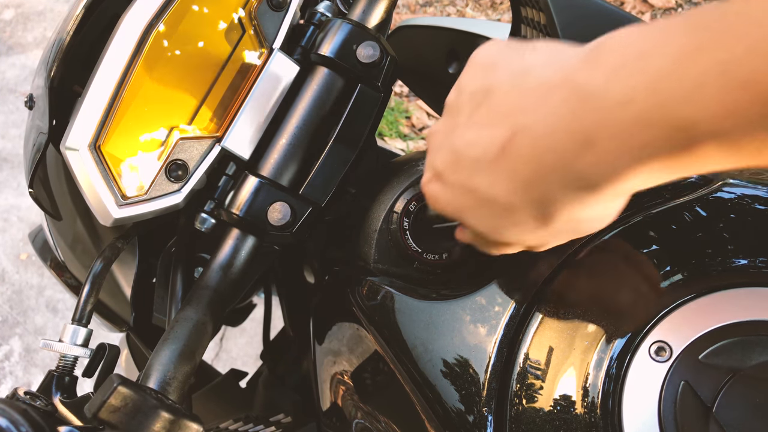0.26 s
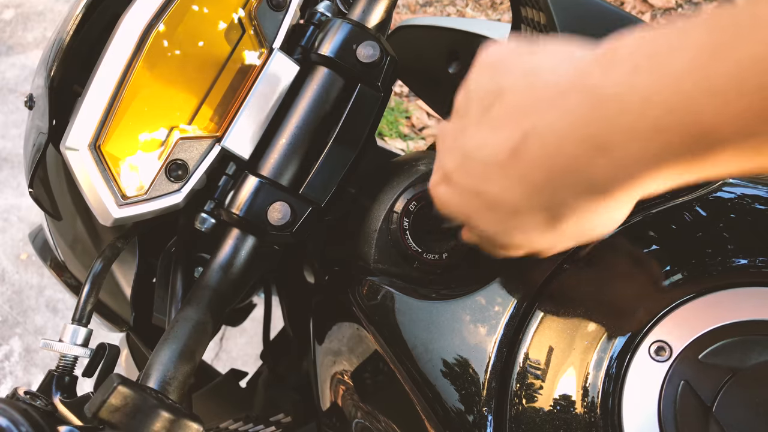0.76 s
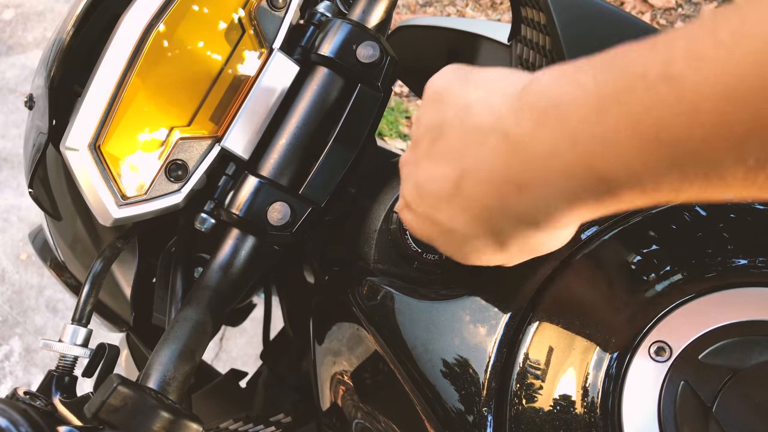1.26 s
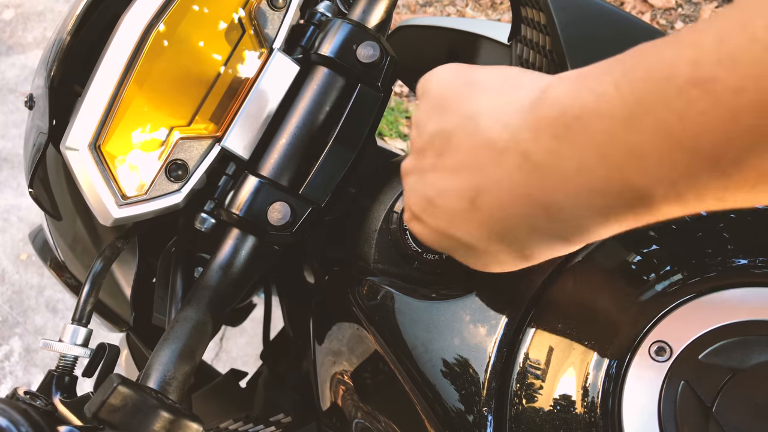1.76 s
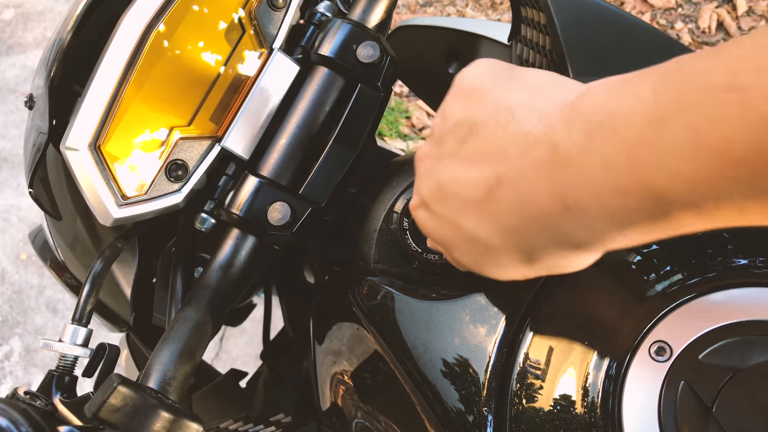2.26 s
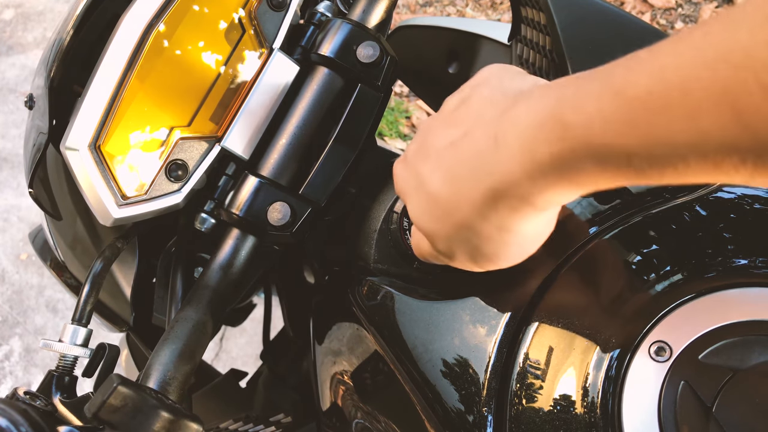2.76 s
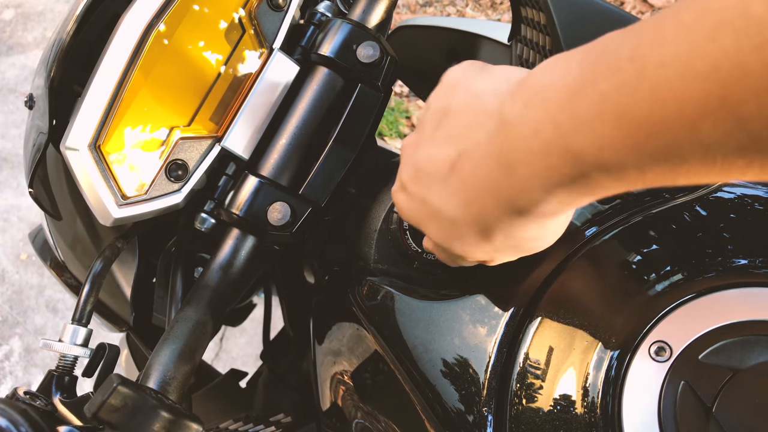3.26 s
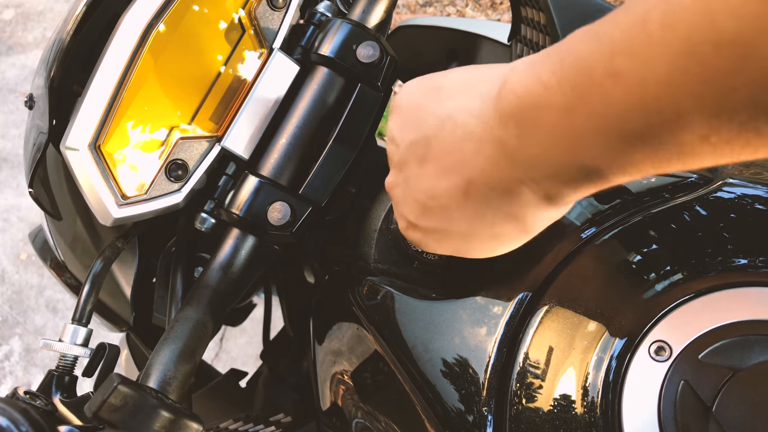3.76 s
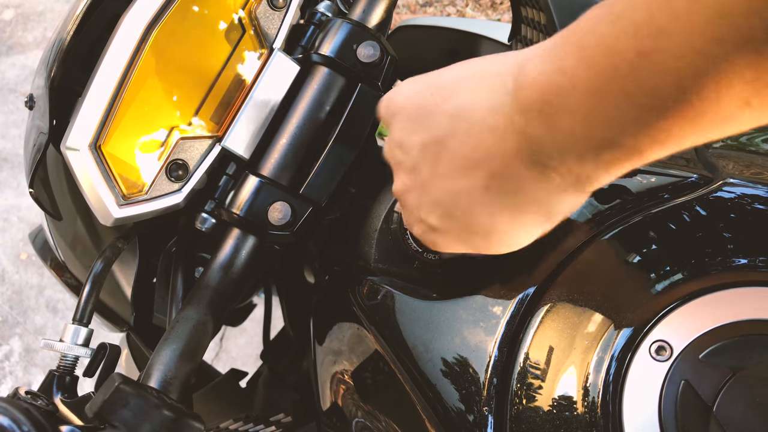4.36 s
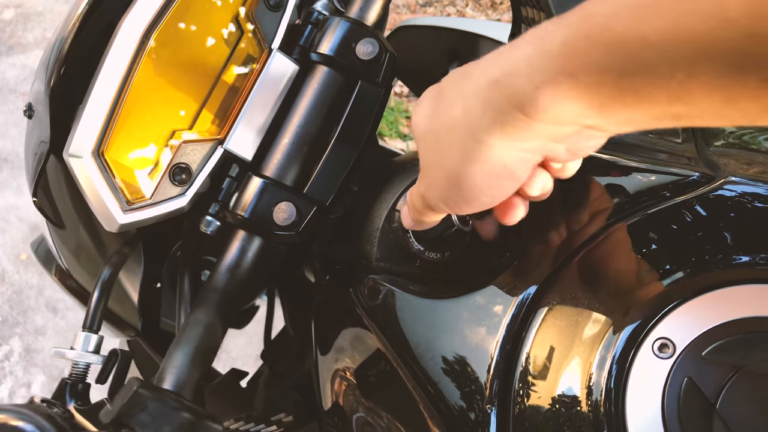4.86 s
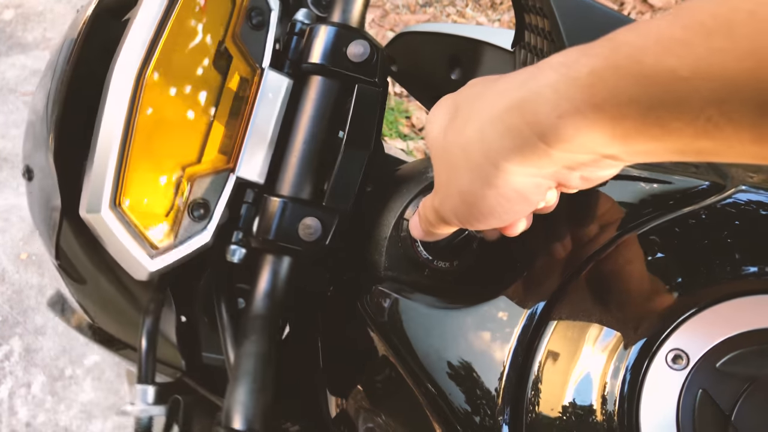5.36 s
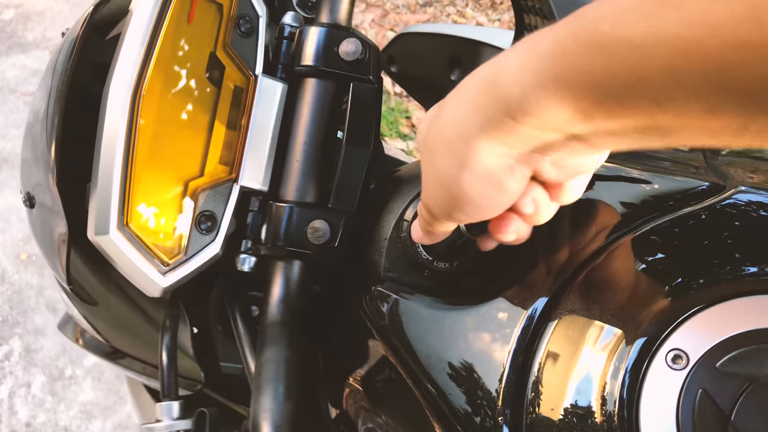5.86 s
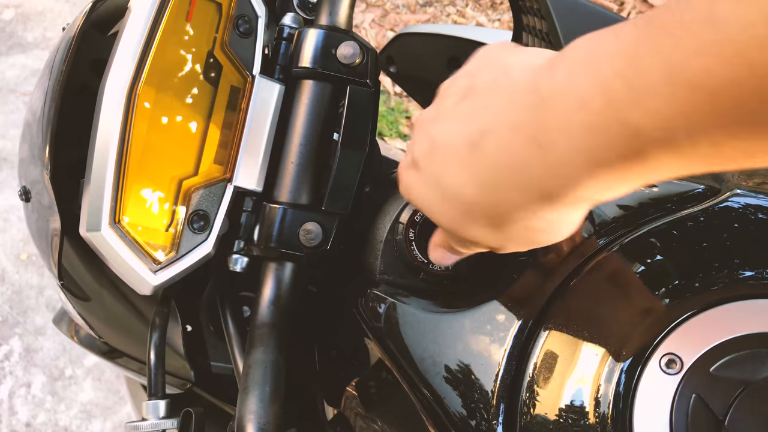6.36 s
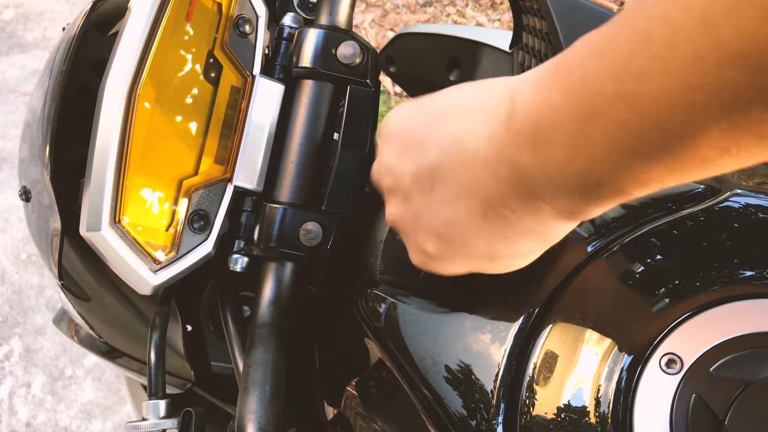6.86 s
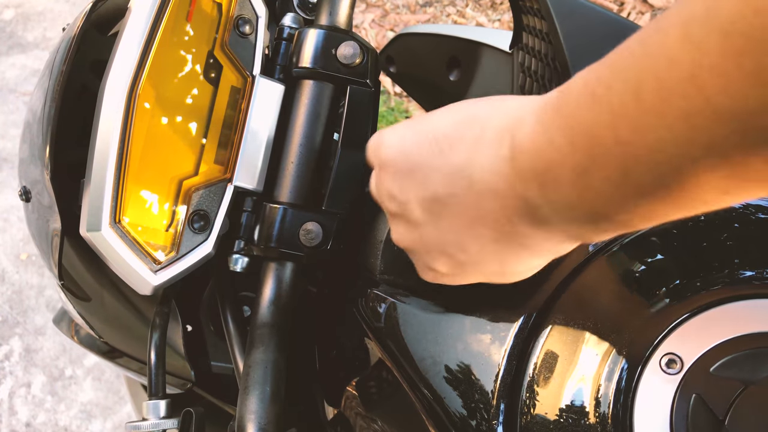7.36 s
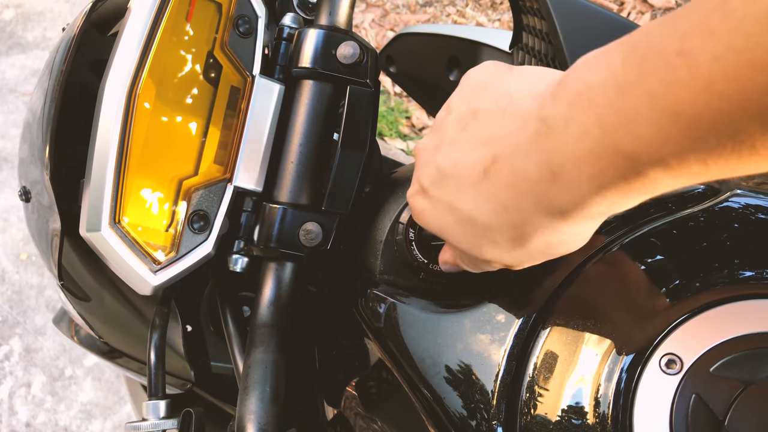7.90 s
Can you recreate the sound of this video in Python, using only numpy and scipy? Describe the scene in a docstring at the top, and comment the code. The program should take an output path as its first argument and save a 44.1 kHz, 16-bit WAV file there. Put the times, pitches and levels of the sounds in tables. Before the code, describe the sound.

Small, sharp clicks and gritty scrapes come from a key being worked in a motorcycle's stiff ignition, heard up close over a faint hum of traffic. After a quieter stretch the key ring chinks once and the handlebars knock and rattle as they turn. The rushing tyres of a passing car rise and slowly ease off in the open air, with several last clicks from the lock.

```python
"""Outdoors, close beside a parked motorcycle, a key is wiggled in the sticky ignition lock.
Stick-slip friction makes it scrape, impacts on the wafers make it click, and the frame rings faintly.
The key ring jingles, and the steering judders as it is swung, knocking the fork into resonance.
Traffic hums in the distance, a car swells past on tyre roar and a low engine drone,
and a thin, faint whistle glides twice."""
import sys
import numpy as np
from scipy import signal
from scipy.fft import rfft, irfft
from scipy.io import wavfile

SR = 44100
rng = np.random.default_rng(int(sys.argv[2]) if len(sys.argv) > 2 else 0)


def file_out(sig):
    """Save sig as 16-bit WAV at sys.argv[1]."""
    # one column per channel
    cols = np.atleast_2d(sig).T
    # limit, then scale
    lim = np.clip(cols, -1, 1)
    pcm = np.round(lim * 32767).astype(np.int16)
    wavfile.write(sys.argv[1], SR, pcm)


N = 358533
TIME = np.arange(N) / SR
WAFER_HZ = 3830   # typical pitch of a wafer click

# modes of the frame and tank: (frequency [Hz], level [dB], t60 [s])
FRAME_MODES = [(258.8, -52.5, 0.19), (387, -63.5, 0.46), (416, -59, 0.229), (539, -66, .2),
               (624, -61.5, 0.23), (988, -58.5, 0.29), (1480, -76, 0.19), (2280, -73.5, 0.32),
               (2880, -63, 0.17), (2800, -66, 0.21), (3165, -67, 0.23), (3590, -57, 0.13),
               (4600, -65.5, 0.11), (5600, -70, .15)]


def from_db(db):
    """Amplitude grows tenfold with every 20 dB."""
    return 10 ** (np.asarray(db) / 20)


def rms_one(x):
    """Normalisation to unit mean power."""
    return x / np.sqrt(np.mean(x ** 2) + 1e-20)


def decay(t, t60):
    """Exponential damping: 60 dB down after t60 seconds."""
    return np.exp(-np.log(1000) * t / t60)


def in_time(rows):
    """Linear interpolation of (time, values...) rows to one curve per value."""
    times, *columns = np.transpose(rows)
    return [np.interp(TIME, times, column) for column in columns]


def add(out, s, sound):
    """Superposition: a sound joins the mix at s seconds."""
    i = max(0, round(s * SR))
    out[i:i + len(sound)] += sound[:max(0, N - i)]


def noise(spectrum):
    """Spectral shaping of white noise by (frequency, level) rows, at unit power."""
    hz, db = np.transpose(spectrum)
    f = np.maximum(np.arange(N // 2 + 1) * SR / N, 1)
    skirt = np.minimum(1, hz[-1] / f) ** 2 * np.minimum(1, f / hz[0]) ** 2
    colour = from_db(np.interp(np.log(f), np.log(hz), db))
    return rms_one(irfft(rfft(rng.standard_normal(N)) * skirt * colour, N))


def drift(per_s):
    """Random modulation of unit power, heading for a new value per_s times a second."""
    knots = rng.standard_normal(2000)
    return rms_one(np.interp(TIME * per_s, np.arange(len(knots)), knots))


def band(x, low_hz, high_hz):
    """Band-pass filtering between two edges."""
    edges = [low_hz, min(high_hz, .45 * SR)]
    return signal.sosfilt(signal.butter(3, edges, "band", fs=SR, output="sos"), x)


def resonate(x, hz, width_hz, db):
    """A resonance lifts the band around its natural frequency."""
    return x + (from_db(db) - 1) * signal.lfilter(*signal.iirpeak(hz, hz / width_hz, fs=SR), x)


def ring(force, hz, t60):
    """A damped oscillator: a unit impulse starts a sine of height 1."""
    r, w = decay(1 / SR, t60), 2 * np.pi * hz / SR
    return signal.lfilter([0, np.sin(w)], [1, -2 * r * np.cos(w), r * r], force + 1e-18)


def strike(hits, modes, spread_db):
    """Modal response: each hit drives each mode by a random amount; neighbours swing opposite ways."""
    out = np.zeros(N)
    for k, (hz, mode_db, t60) in enumerate(modes):
        impulses = np.zeros(N)
        for (s, db), chance in zip(hits, rng.standard_normal(len(hits))):
            add(impulses, s, from_db([db + mode_db + spread_db * chance]))
        out += (-1) ** k * ring(impulses, hz, t60)
    return out


def swell(apex_s, apex_db, rise_db_per_s, fall_db_per_s, turn_s):
    """Level follows distance: ramps in dB for approach and retreat, rounded off below their apex."""
    t = TIME - apex_s
    away = np.hypot(t, turn_s)
    return apex_db - rise_db_per_s * (away - t) / 2 - fall_db_per_s * (away + t) / 2


def traffic(flutter_db=0.85):
    """Rolling tyres radiate broadband noise, which swells as far traffic and one car go by."""
    # spectra of far traffic and the car's roar, low body and tyre hiss: (frequency [Hz], level [dB])
    far = [(40, 8), (130, 6), (200, -3), (280, -2), (400, -6.5), (600, -5.5), (780, -2), (950, 2),
           (1200, -3.5), (1550, 1.5), (1900, -4), (2500, -13.5), (4000, -27), (9000, -37)]
    roar = [(200, -25.5), (400, -9), (620, -3), (820, 0.5), (1000, 2), (1130, -7.5), (1350, -2.5),
            (1700, -5.5), (2100, -11), (2700, -21), (4000, -47)]
    body = [(50, 2.5), (110, -7), (170, -2), (260, 1.5), (350, -6), (500, -3), (800, -26), (1500, -18.5)]
    hiss = [(1200, -8), (2200, 3.5), (3000, 0.5), (4200, -3), (5200, -9), (7000, -12.5), (9500, -20),
            (11000, -26), (16000, -30)]
    layers = [(far, swell(5.5, -45.5, 3, 1, .5)),
              (roar, swell(6, -34.5, 17.5, 3.5, .67)),
              (body, swell(6, -43, 17, .3, .5)),
              (hiss, swell(7, -48, 11, 10, .3))]
    tyres = sum(from_db(db + flutter_db * drift(14)) * noise(colour) for colour, db in layers)
    return resonate(tyres, hz=930, width_hz=110, db=1)   # air ringing in the grooves of the tread


def engine(firing_hz, db, harmonics, waver_db, wander):
    """Periodic exhaust pulses give wavering harmonics (order, level [dB]) of the firing rate."""
    phase = 2 * np.pi * np.cumsum(firing_hz * (1 + wander * drift(12))) / SR
    return np.sqrt(2) * sum(from_db(db + order_db + waver_db * drift(9.2)) * np.sin(order * phase)
                            for order, order_db in harmonics)


def street():
    """Independent sources add in power: tyres, a far idling engine, the car's engine and open air."""
    # the car's engine: (time [s], firing rate [Hz], level [dB])
    car_engine = [(0, 46, -63), (4.2, 47, -63), (4.7, 47, -54), (5.7, 46, -51), (6.3, 45, -58),
                  (6.9, 44.5, -48), (7.3, 42.5, -44), (7.7, 41.5, -40.5), (8.13, 40, -47)]
    # rumble of open air: (frequency [Hz], level [dB])
    air = [(20, -39), (32, -22), (45, -9), (75, 2.5), (115, -0.5), (160, -13), (300, -18.5), (1000, -33),
           (3000, -38.5), (8000, -43.5), (10500, -49), (12500, -42), (16000, -51)]
    tyres = traffic()
    idle_hz, idle_db = 101.45 - .6 * TIME, swell(4.5, -42, 4.5, 6, .76)
    idle = engine(idle_hz, idle_db, [(1, -1), (2, -22)], waver_db=1, wander=0.0065)
    car_harmonics = [(1, -1.5), (2, -9.5), (4, -15.5), (6, -11.5)]
    drone = engine(*in_time(car_engine), car_harmonics, waver_db=1.5, wander=0.0082)
    return tyres + idle + drone + from_db(-52) * noise(air)


def whistles(top_db=-78, db_per_octave=12, flicker_db=5, upper_db=-11):
    """Frequency modulation: a thin tone glides, fading as it falls, with a weaker one just above."""
    # two pitch glides, each: (time [s], frequency [Hz])
    glides = [
        [(2.6, 10700), (2.68, 9600), (2.76, 10250), (2.83, 9000), (2.9, 9480), (3.0, 8200), (3.28, 6500)],
        [(5.56, 9950), (5.72, 9950), (5.78, 10500), (5.81, 10000), (5.86, 11150), (5.91, 11250), (5.98, 9500),
         (6.08, 8700)],
    ]
    out = np.zeros(N)
    for glide in glides:
        hz, = in_time(glide)
        sounding = (TIME > glide[0][0]) & (TIME < glide[-1][0])
        db = top_db + db_per_octave * np.log2(hz / hz.max()) + flicker_db * drift(45)
        phase = 2 * np.pi * np.cumsum(hz * (1 + .003 * drift(300))) / SR
        tones = np.sin(phase) + from_db(upper_db) * np.sin(1.11 * phase)
        out += np.sqrt(2) * sounding * from_db(db) * tones
    return out


def key_ring(chink_db=-3, chink_t60=0.045):
    """Impacts on light metal: each touch is a bright, rough chink and sets the ring's modes going."""
    # touches of the loose ring: (time [s], level [dB])
    touches = [(4.548, -40.5), (4.553, -42.5), (4.557, -51), (4.561, -46), (4.565, -46), (4.581, -44.5)]
    # modes of the ring: (frequency [Hz], level [dB], t60 [s])
    modes = [(4110, -1.5, 0.039), (4500, -11, .03), (6500, -11, .03), (8160, -7, .04), (11300, -5, .03),
             (11540, 2, 0.055), (11560, -10, .08), (12210, -8, .06), (12800, -14, .05), (13300, -12, .03),
             (14220, -6, .035), (14800, -8, .03), (15100, -1, .03), (15600, -7, .03)]
    t, chinks = TIME[:SR // 5], np.zeros(N)
    for s, db in touches:
        add(chinks, s, from_db(db + chink_db) * decay(t, chink_t60) * rng.standard_normal(len(t)))
    return band(chinks, 3700, 16500) + strike(touches, modes, spread_db=3)


def steering(lag_s=0.003, rebound_s=0.008, rise_s=0.00076):
    """Stick-slip in the front end: each slip knocks the fork twice and shakes the fittings."""
    # slips of the steering: (time [s], knock level [dB], rattle level [dB])
    judders = [(5.179, -25, -42.5), (5.267, -32, -45.5), (5.303, -31, -48), (5.348, -30, -46),
               (5.396, -31, -48.5), (5.432, -29, -45.5), (5.531, -31.5, -43.5)]
    # modes of the fork and front wheel: (frequency [Hz], level [dB], t60 [s])
    fork_modes = [(105.5, -10, 0.12), (126, -6, 0.14), (199, -6.5, 0.081), (270, -8, 0.046),
                  (321, -1.5, 0.079), (415, -3.5, 0.064), (440, -4.5, 0.075), (546, -14, 0.033),
                  (680, -8.5, 0.046), (875, -14, .035), (1290, -12, 0.023), (1670, -17, 0.033)]
    # spectrum of the loose handlebar fittings: (frequency [Hz], level [dB])
    fittings = [(700, 1), (1700, 9), (2500, -1.5), (3400, -2.5), (3900, 2.5), (4900, -12.5), (5930, -7),
                (7500, -15), (8600, -13), (9300, -5.5), (10000, -15), (12000, -14), (16000, -21)]
    hits = [(s + lag_s + later, db - 2) for s, db, _ in judders for later in (0, rebound_s)]
    knocks = strike(hits, fork_modes, spread_db=5)
    t, shaking = TIME[:SR // 2], np.zeros(N)
    envelope = (1 - np.exp(-t / rise_s)) * (decay(t, t60=0.049) + from_db(-14) * decay(t, t60=0.36))
    for s, _, rattle_db in judders:
        add(shaking, s, from_db(rattle_db) * envelope)
    return knocks + shaking * from_db(5 + 3.7 * drift(250)) * noise(fittings)


def jolts(db_per_octave=30, smear=0.37):
    """Impact excitation: the barrel hits a stop and rings the frame's modes nearest one frequency."""
    # hard stops: (time [s], level [dB], frequency struck hardest [Hz])
    stops = [(0.213, -46, 3060), (0.565, -54, 3000), (0.878, -37, 4600), (1.194, -48, 4590),
             (1.228, -55, 2800), (1.996, -46, 3050), (2.538, -38.5, 418), (3.54, -46, 3180),
             (7.472, -53, 3250)]
    t, out = TIME[:SR // 2], np.zeros(N)
    for s, db, centre_hz in stops:
        for hz, _, t60 in FRAME_MODES:
            gain = from_db(db - db_per_octave * abs(np.log2(hz / centre_hz)))
            blurred_hz = hz * (1 + smear * rng.standard_normal(len(t)))   # by rattling contacts
            cycles = np.cumsum(blurred_hz) / SR + rng.random()
            add(out, s, gain * decay(t, t60) * np.sin(2 * np.pi * cycles))
    return out


def housing(x):
    """Source and filter: the lock's resonances colour all that happens inside it."""
    # resonances of the barrel and housing: (frequency [Hz], width [Hz], gain [dB])
    resonances = [(236, 54, 11), (388, 72, 9.5), (645.5, 57, 13.5), (1410, 48, 6), (1890, 140, 6.5),
                  (2840, 330, 3), (3215, 41, 5), (3710, 166, 5), (4230, 160, 5), (4600, 320, 2.5),
                  (6760, 156, 4), (8680, 420, 5.5), (11300, 300, 3), (13000, 250, -2), (14900, 290, 4)]
    for hz, width_hz, db in resonances:
        x = resonate(x, hz, width_hz, db)
    return x


def key_pressure(depth_db=17):
    """The amplitude envelope of friction: each slide builds to its strongest moment and lets go."""
    # slides of the key over the wafers: (start [s], peak [s], end [s], level [dB])
    slides = [(0.034, 0.153, 0.25, -51), (0.285, 0.349, 0.44, -47.5), (0.459, 0.53, 0.62, -46),
              (0.658, 0.71, 0.79, -45), (0.785, 0.867, 0.95, -46), (0.982, 1.044, 1.117, -47),
              (1.112, 1.175, 1.29, -49.5), (1.2, 1.442, 1.62, -58.5), (1.915, 1.981, 2.0, -50),
              (2.293, 2.347, 2.41, -51.5), (2.44, 2.523, 2.62, -51), (4.4, 4.86, 5.3, -66)]
    pressure = np.zeros(N)
    for start, peak, end, db in slides:
        level_db = np.interp(TIME, [start, peak, end], [db - depth_db, db, db - depth_db])
        pressure += from_db(level_db) * (TIME > start) * (TIME < end)
    return pressure


def scrape(pressure, slips_per_s=1500, size_db=4.5, patchy_db=2.5, scatter_t60=0.0083):
    """Stick-slip friction: sliding metal sheds dense tiny grains of sound, scattered in the barrel."""
    slipping = rng.random(N) < slips_per_s / SR
    slips = slipping * from_db(size_db * np.minimum(rng.exponential(1, N), 3))
    power = signal.lfilter([1], [1, -decay(1 / SR, scatter_t60) ** 2], slips ** 2 + 1e-12)
    grains = np.sqrt(power) * rng.standard_normal(N)
    rasp = resonate(band(grains, 1170, 13700), hz=4700, width_hz=2160, db=6)
    body = from_db(1) * (band(grains, 180, 1500) + band(grains, 207, 680))
    return pressure * from_db(patchy_db * drift(90)) * rms_one(housing(rasp + body))


def wafer_touches(pressure, per_s=65, spread_db=2.5, faintest_db=-62):
    """Light impacts at random intervals, as strong as the key is pressed: rows for clicks()."""
    gap, loudness, weight, edge, pitch = rng.standard_normal((1000, 5)).T
    times = np.cumsum(np.exp(.4 * gap)) / per_s
    db = 20 * np.log10(np.interp(times, TIME, pressure, right=0) + 1e-9)
    weight_db, edge_db = -6.5 + spread_db * weight, -1.5 + spread_db * edge
    click_hz = WAFER_HZ * 2 ** (np.tanh(pitch) / 2)
    rows = np.column_stack([times, db + spread_db * loudness, weight_db, edge_db, click_hz])
    return rows[db > faintest_db]


def clicks(contacts, firm_db=-34, octaves_per_db=0.73):
    """Impact transients: a crack, a short ring of the lock and a tail scattered by the bodywork."""
    # thud, knock, click and tick bands: (low edge [Hz], high edge [Hz], crack t60 [s],
    # ring t60 [s], ring level [dB], tail t60 [s], tail level [dB])
    bands = [(135, 950, 0.015, 0.089, -6, 0.31, -21), (830, 2870, 0.0097, 0.053, -10, 0.17, -22.5),
             (2420, 6260, 0.0046, 0.021, -5.5, 0.16, -26.5), (5470, 14400, 0.01, 0.03, -13, 0.13, -26)]
    t, out = TIME[:SR // 7], np.zeros(N)
    times, db, weight_db, edge_db, click_hz = np.transpose(contacts)
    knock_db = -1 + 0.25 * weight_db + 6.5 * np.log2(WAFER_HZ / click_hz)   # more if heavy or low
    ringing = from_db(0.088 * (db[:, None] - firm_db))   # light touches ring less
    tick_octaves = octaves_per_db * edge_db + 0.27 * rng.uniform(-1, 1, len(times))
    tick_hz = np.minimum(11840 * 2 ** tick_octaves, 15000)   # a keener edge rings smaller parts
    levels_db = [db + weight_db, db + knock_db, db, db + edge_db]
    peaks = [None, None, (click_hz, 11), (tick_hz, 7)]   # (frequency [Hz], gain [dB])
    for k, (low, high, crack_t60, ring_t60, ring_db, tail_t60, tail_db) in enumerate(bands):
        # the heavy parts of the lowest band start later; the onset sets a burst's level
        rise_s, onset_samples = (0.0011, SR // 70) if k == 0 else (0.00039, SR // 200)
        lock_ring = ringing * from_db(ring_db) * decay(t, ring_t60)
        tail = ringing * from_db(tail_db) * decay(t, tail_t60)
        envelope = np.sqrt(decay(t, crack_t60) ** 2 + lock_ring ** 2 + tail ** 2)
        envelope *= 1 - np.exp(-t / rise_s)
        bursts = band(housing(envelope * rng.standard_normal(envelope.shape)), low, high)
        for i, burst in enumerate(bursts):
            if peaks[k]:   # the spot touched favours one pitch of the small metal parts
                hz, peak_db = peaks[k]
                burst = resonate(burst, hz[i], 0.12 * hz[i], peak_db)
            add(out, times[i], from_db(levels_db[k][i]) * burst / np.std(burst[:onset_samples]))
    return out


def ignition_lock():
    """Structure-borne sound: the key's scrapes and clicks drive the frame into sympathetic ringing."""
    # the key catches or hits a stop:
    # (time [s], level [dB], weight of the thud [dB], edge of the tick [dB], pitch [Hz])
    catches = [(0.15, -45, -8, 1, 4200), (0.164, -33.5, -1.5, -9, 2940), (0.172, -37, 1.5, -3, 4290),
               (0.183, -32, -8, 0.5, 4100), (0.192, -33.5, -3, -1, 4470), (0.214, -31.5, -10, -13, 4700),
               (0.291, -38, 0, -11, 4500), (0.335, -45, 2, -10, 3410), (0.517, -41, -9, 1, 3300),
               (0.538, -35.5, 5.5, -3, 2600), (0.544, -24.5, -9, -9, 4500), (0.55, -38, -6, 2, 1500),
               (0.565, -27.5, -16, -13, 2700), (0.65, -47, 10, -14, 2600), (0.696, -43.5, -5.5, -0.5, 4900),
               (0.749, -41, -5, 3, 3640), (0.83, -36, -27, -10, 2640), (0.851, -46, 4, 7, 3000),
               (0.859, -41, 8, -6, 1795), (0.867, -37.5, -3, -4, 2770), (0.875, -22, -7.5, -0.5, 4520),
               (0.893, -40.5, 7.5, -6, 2190), (0.911, -28.5, -22, -14, 2860),
               (0.984, -36.5, -2.5, -8.5, 4510), (1.026, -50, 7.5, 2, 2833), (1.143, -42, -9, -1.5, 2730),
               (1.162, -45, -17, 8, 3860), (1.18, -34, -3, -4, 3400), (1.192, -23, -10, -1, 4500),
               (1.201, -31.5, -0.5, -3, 4400), (1.218, -29, -10, -1.5, 2970), (1.228, -30, -5.5, -10, 3500),
               (1.367, -44, 4, -17, 4580), (1.435, -41.5, -1.5, -8, 3250), (1.757, -51, -9.5, -8, 3370),
               (1.956, -48, 8.5, 1, 3280), (1.966, -39, -9, -8, 5300), (1.984, -45, -6, -12, 1200),
               (1.995, -29, -15, -15, 3000), (2.293, -49.5, 6, -1, 3810), (2.327, -46.5, 2, 4.5, 3550),
               (2.485, -45, -6, 1, 3835), (2.517, -32.5, -0.5, -3.5, 3630), (2.533, -35.5, -3, 0, 1480),
               (2.546, -35, 0.5, -2.5, 2800), (2.561, -39, -1, -17, 1500), (2.736, -61.5, 19, 2, 3650),
               (3.012, -53.5, -4, 7, 4670), (3.072, -60.5, 5, 1, 2400), (3.527, -42.5, -17, -7, 4800),
               (3.541, -32.5, -13.5, -25, 3530), (3.871, -49, 3.5, -13, 4040),
               (3.998, -51.5, -24, -9, 2520), (4.654, -54.5, -18, -1, 3500), (5.019, -54, -12, -3, 2780),
               (5.757, -55.5, -7, 5, 3500), (6.117, -34.5, -5, -1.5, 4500), (6.26, -58.5, -5, 14, 3050),
               (6.637, -60, -1, 12, 2800), (6.817, -35, -7, -12, 3480), (6.908, -37, 1, 2.5, 3200),
               (7.153, -43, 4.5, -4.5, 2540), (7.472, -25.5, -16, -9.5, 3150), (7.48, -32.5, -2.5, 0, 4130),
               (7.593, -41, -2, 6, 5620)]
    pressure, jolted = key_pressure(), jolts()
    direct = from_db(1) * scrape(pressure)
    direct += from_db(-1.5) * clicks(catches)
    direct += clicks(wafer_touches(pressure))
    frame = sum(from_db(db) * ring(direct, hz, t60) for hz, db, t60 in FRAME_MODES)
    return direct + jolted + frame


def scene():
    """Superposition in one channel: the street behind; key ring, steering and lock close by."""
    return (street() + whistles() + key_ring() + steering() + ignition_lock())[None]


def record(dry, bass_hz=32, top_hz=16150):
    """Band limiting: the deepest bass is dropped and the top is cut steeply."""
    dry = signal.sosfilt(signal.butter(6, bass_hz, "high", fs=SR, output="sos"), dry)
    return signal.sosfilt(signal.ellip(10, .1, 70, top_hz, fs=SR, output="sos"), dry)


dry = scene()
out = record(dry)
file_out(out)
```